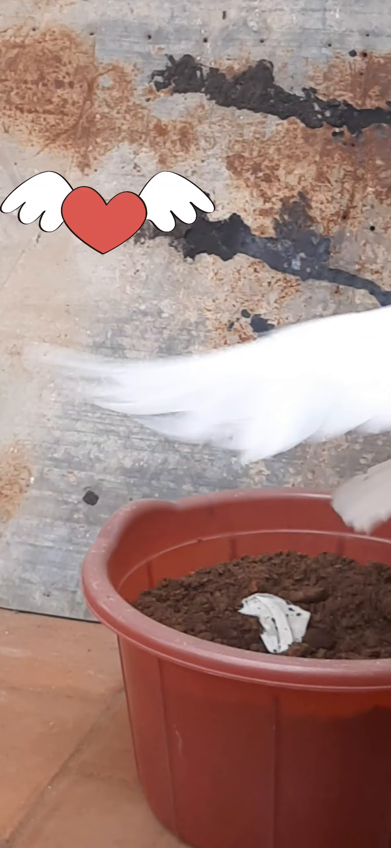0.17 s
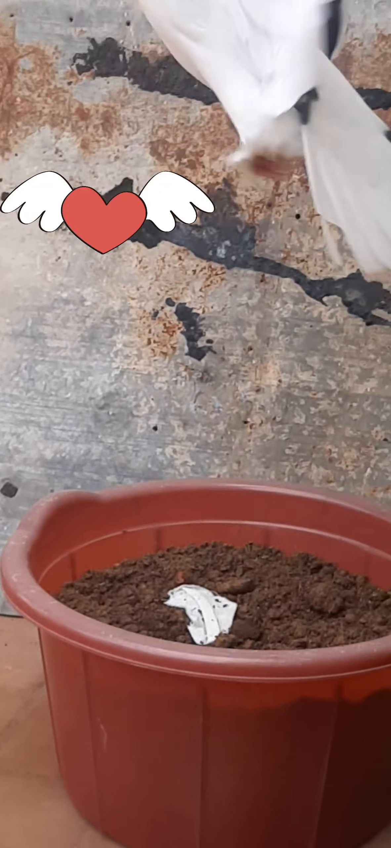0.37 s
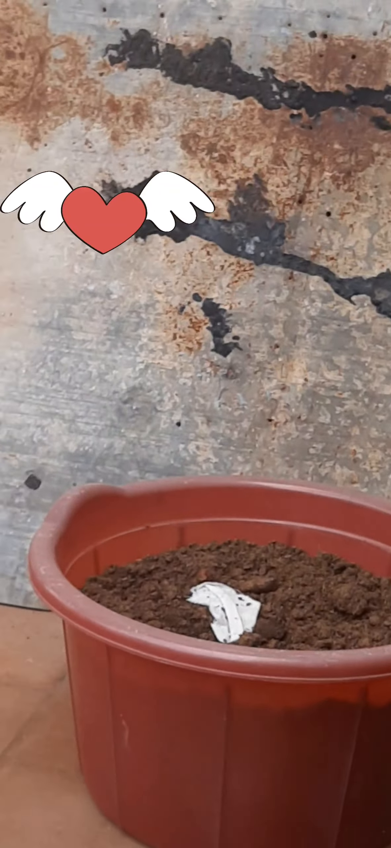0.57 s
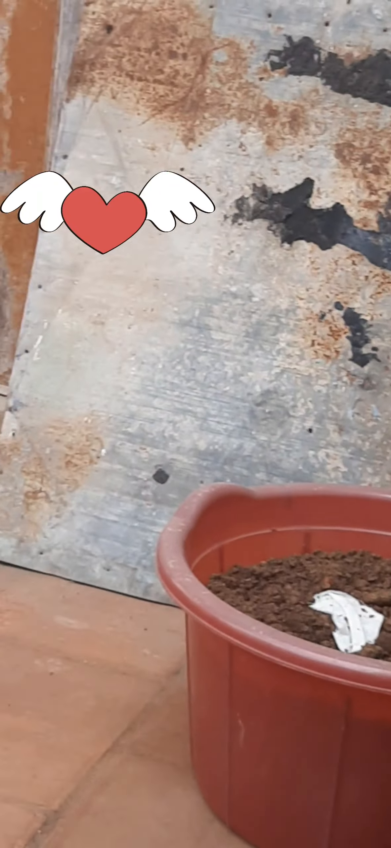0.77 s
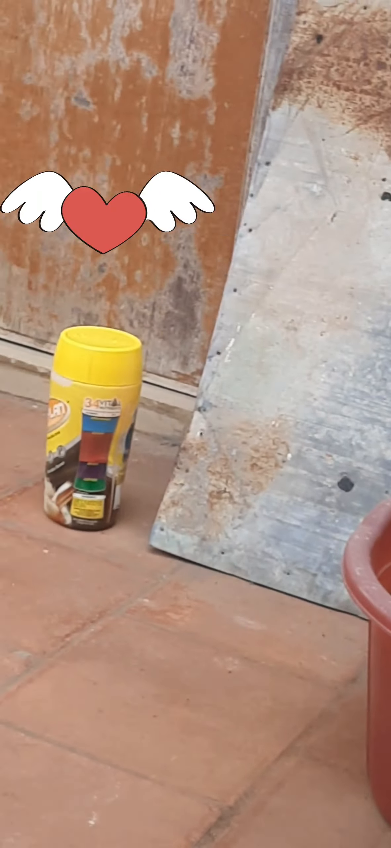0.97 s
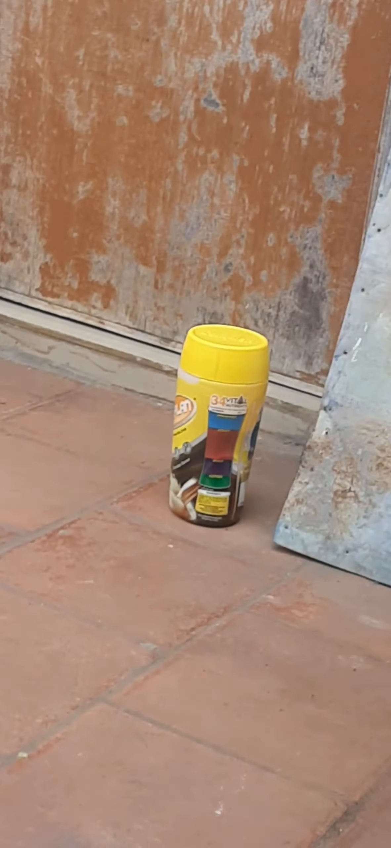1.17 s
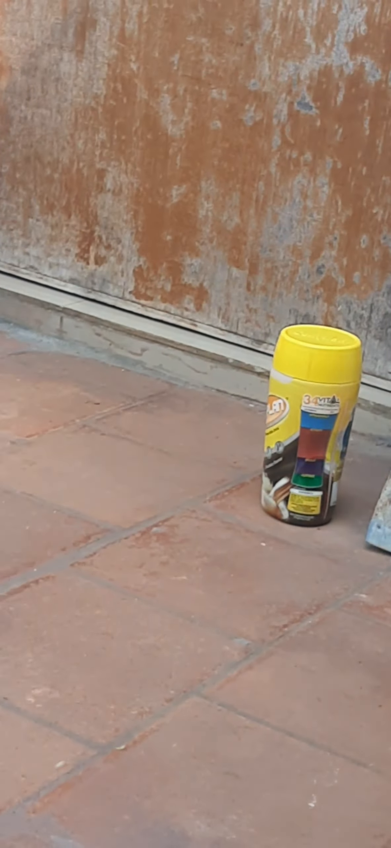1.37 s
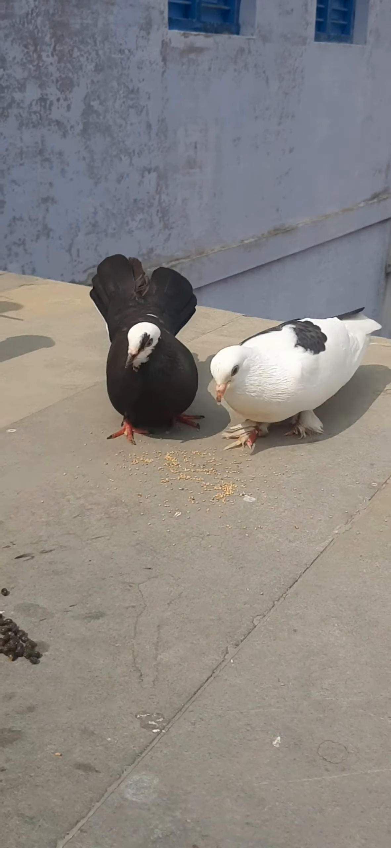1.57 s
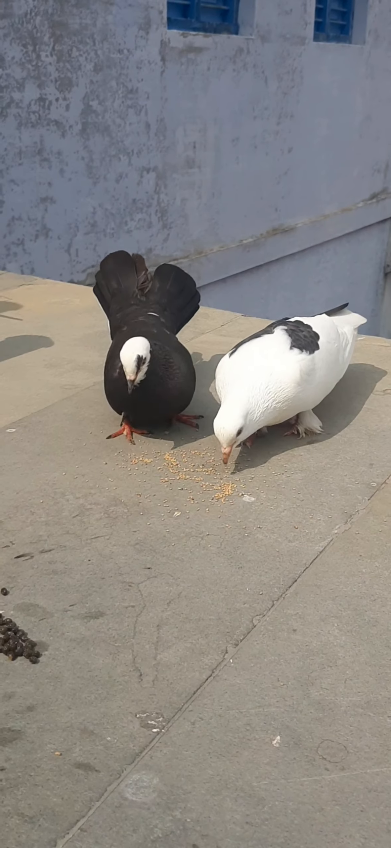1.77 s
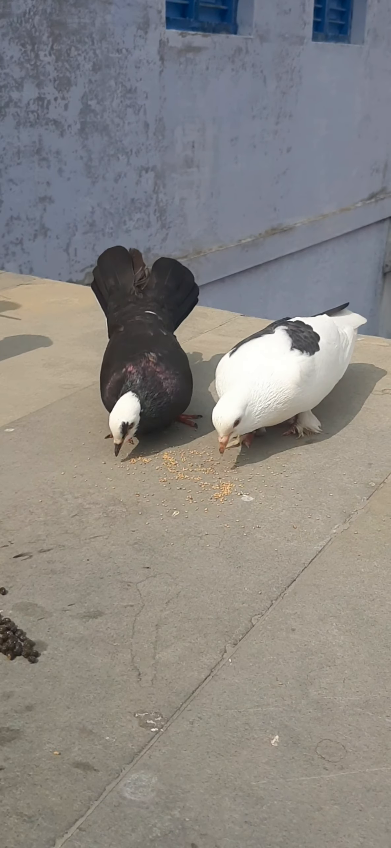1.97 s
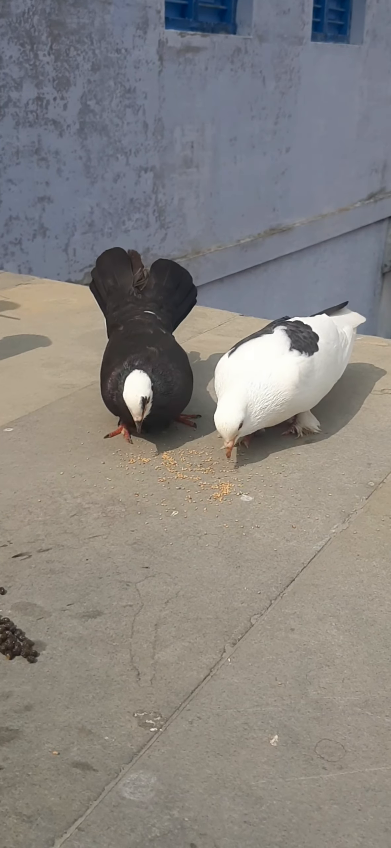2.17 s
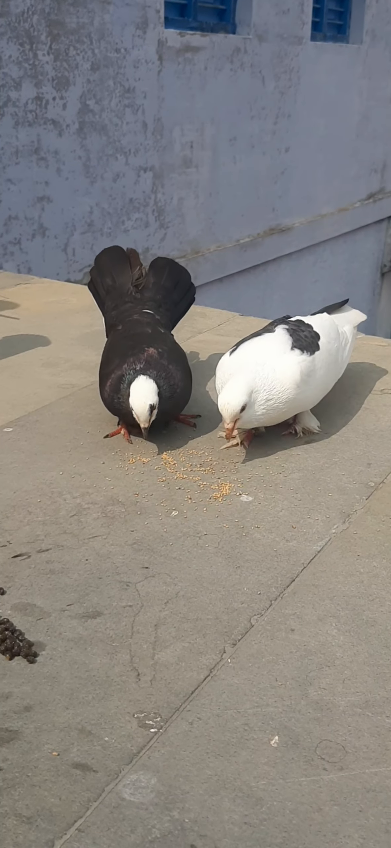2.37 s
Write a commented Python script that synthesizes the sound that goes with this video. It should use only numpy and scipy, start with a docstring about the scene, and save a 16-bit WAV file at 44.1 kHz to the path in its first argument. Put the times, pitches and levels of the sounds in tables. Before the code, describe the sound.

Pigeon wings clap and swish after a few hoarse chirps, echoing off yard walls and puffing air against the microphone. Rasping clucks and one thin squeal come from other birds, then everything cuts to a quiet terrace with low rumble.

```python
"""A small tiled yard: a pigeon takes off, wing tips clapping together and echoing off the walls.
Its feathers rustle, and its wings push air that swishes and buffets the microphone. Other birds
give hoarse chirps, rasping clucks and one long squeal. After a short silence, a quiet open terrace:
low rumble, faint air and a distant bird."""
import sys
import numpy as np
from scipy import signal
from scipy.fft import rfft, irfft
from scipy.io import wavfile
from scipy.ndimage import uniform_filter1d

SR = 44100
rng = np.random.default_rng(int(sys.argv[2]) if len(sys.argv) > 2 else 0)


def wrap_up_sound(samples):
    """Save the sound to the file named by the first command line argument, as 16-bit audio."""
    columns = np.atleast_2d(samples).T
    # keep every value between -1 and 1, then stretch to whole-number steps
    tamed = np.clip(columns, -1, 1)
    steps = np.round(tamed * 32767).astype(np.int16)
    wavfile.write(sys.argv[1], SR, steps)


N = 110250
TIME_S = np.arange(N) / SR
BINS_HZ = np.fft.rfftfreq(N, 1 / SR)


def amp(db):
    return 10 ** (np.asarray(db) / 20)


def unit_rms(x):
    return x / np.sqrt(np.mean(x ** 2) + 1e-20)


def at_hz(table, hz):
    """Interpolate a spectrum table over log frequency."""
    freq_hz, value = np.transpose(table)
    return np.interp(np.log(hz + 1), np.log(freq_hz + 1), value)


def curve(table, column=1):
    """Interpolate a time table at every sample."""
    rows = np.array(table)
    return np.interp(TIME_S, rows[:, 0], rows[:, column])


def add(mix, start_s, sound):
    part = mix[..., max(round(start_s * SR), 0):][..., :sound.shape[-1]]
    part += sound[..., :part.shape[-1]]


def colour(x, db_at_hz):
    """Minimum-phase filter."""
    log_gain = np.log(amp(db_at_hz(abs(np.fft.fftfreq(4096, 1 / SR)))))
    taps = np.fft.ifft(np.exp(np.conj(signal.hilbert(log_gain)))).real[:2048]
    return signal.fftconvolve(x, taps[None], axes=1)[:, :x.shape[1]]


def white_pair(correlation, count=N):
    left, other = rng.standard_normal((2, count))
    return np.array([left, correlation * left + np.sqrt(1 - correlation ** 2) * other])


def noise(tone, correlation):
    """Stereo noise of a given spectrum, rms 1."""
    return unit_rms(irfft(rfft(white_pair(correlation)) * amp(at_hz(tone, BINS_HZ)), N))


def wobble(rate_hz, count=N):
    """Smooth random motion, rms about 1."""
    spectrum = rfft(rng.standard_normal(N)) * np.exp(-(BINS_HZ / rate_hz) ** 2)
    return unit_rms(irfft(spectrum, N))[:count]


def steady(x):
    """Even out slow swells."""
    return x / np.sqrt(uniform_filter1d((x ** 2).mean(0), 3000) + 1e-9)


def note(length_s, pitches_hz, jitter):
    """Phase and envelope of a note bending through three pitches."""
    progress = np.linspace(0, 1, int(length_s * SR))
    pitch_hz = np.polyval(np.polyfit([0, .5, 1], pitches_hz, 2), progress)
    pitch_hz *= 1 + jitter * wobble(170, len(progress))
    return 2 * np.pi * np.cumsum(pitch_hz) / SR, np.sqrt(2 * abs(np.sin(np.pi * progress)))


def yard_ring(x):
    """Diffuse ring of the walled yard, different at each ear."""
    # reverberation time: freq_hz, t60_s
    decay = [(60, 0.92), (400, 0.46), (1500, 0.26), (5000, 0.29), (15000, 0.22)]
    hz, t, spectra = signal.stft(rng.standard_normal((2, SR * 2 // 3)), SR, nperseg=256)
    tail = signal.istft(spectra * amp(-60 * t / at_hz(decay, hz)[:, None]), SR, nperseg=256)[1]
    tail *= np.minimum(np.arange(tail.shape[1]) / SR / .007, 1)
    tail /= np.linalg.norm(tail[0])
    return signal.fftconvolve(np.atleast_2d(x), tail, axes=1)[:, :x.shape[-1]]


def yard_air():
    """Faint, steady background air."""
    # air spectrum: freq_hz, gain_db
    tone = [(30, 0), (70, 6), (170, 10), (300, 2), (600, -7), (1200, -11), (2000, -11), (3000, -15),
            (5000, -13), (7500, -17), (9000, -28), (11500, -21), (15500, -20)]
    return amp(-59) * noise(tone, correlation=.47)


def chirps():
    """Hoarse, mostly falling chirps: a whistle smeared into a narrow band."""
    # chirps: start_s, length_s, first_hz, middle_hz, last_hz, relative_db, width_hz
    calls = [(0.019, 0.05, 2350, 2166, 2030, -53, 140), (0.061, 0.047, 2070, 1850, 1600, -56.5, 150),
             (0.128, 0.095, 4500, 3740, 3260, -43.5, 400), (0.172, 0.08, 3350, 2790, 2460, -33.5, 300),
             (.298, .04, 2350, 2344, 2500, -39.5, 220)]
    out = np.zeros((2, N))
    for start_s, length_s, *pitches_hz, relative_db, width_hz in calls:
        phase, envelope = note(length_s, pitches_hz, jitter=.058)
        whistle = np.exp(1j * phase) + amp(-20) * np.exp(2j * phase)
        for ear in out:
            rasp = (wobble(width_hz, len(phase)) + 1j * wobble(width_hz, len(phase))) / np.sqrt(2)
            add(ear, start_s, amp(relative_db - 8) * envelope ** 2 * (rasp * whistle).real)
    return out + amp(-1.5) * yard_ring(out)


def buffet():
    """Wing draught on the microphone: bass noise, nearly mono."""
    # draught strength: time_s, level_db
    levels = [(0, -67), (.12, -57), (.17, -53), (.215, -62), (.25, -40), (.32, -52.5), (.365, -37),
              (.42, -42), (.49, -33.5), (.55, -43), (.6, -31.5), (.67, -42), (.73, -36), (.81, -44.5),
              (.87, -40), (.94, -45), (1.01, -42), (1.12, -42), (1.27, -42), (1.34, -52.5), (1.38, -47),
              (1.45, -53), (1.58, -54.5)]
    # draught spectrum: freq_hz, gain_db
    tone = [(15, -16), (35, -8), (62, 2), (108, 0), (150, -11), (250, -25), (600, -55), (2000, -90)]
    return steady(noise(tone, correlation=.95)) * amp(curve(levels))


def rustle():
    """Rustling feathers: broad noise with slow flutter and fine grain."""
    # rustle strength: time_s, level_db
    levels = [(0, -85), (.13, -64), (.18, -50.5), (.23, -40), (.29, -42.5), (.34, -40.5), (.39, -36.5),
              (.46, -34.5), (.56, -34.5), (.68, -38.5), (.83, -44.5), (.95, -42), (1.02, -37.5),
              (1.12, -40), (1.19, -44.5), (1.25, -38.5), (1.34, -47.5), (1.58, -49)]
    # rustle spectrum: freq_hz, gain_db
    tone = [(30, -10), (100, -3), (250, 3), (450, -2), (600, -2), (800, 2), (1200, -.5), (1600, 1),
            (2500, -3), (4500, -3), (7500, -6), (11000, -8), (15500, -8)]
    return noise(tone, correlation=.083) * amp(curve(levels) + 1.3 * wobble(50) + 1.5 * wobble(1100))


def clucks():
    """Short, rasping two-partial calls across the yard."""
    # clucks: start_s, length_s, first_hz, middle_hz, last_hz, relative_db, octave_db
    calls = [(0.136, 0.09, 584, 585, 552, -55.5, -23), (.315, .035, 476, 537, 600, -43.5, -17),
             (0.383, 0.032, 650, 822, 1056, -33, -12), (0.502, 0.046, 780, 874, 770, -37, -9),
             (0.616, 0.052, 776, 830, 720, -36, -7), (0.751, 0.0478, 654, 765, 785, -33, -5),
             (.9, .05, 815, 778, 654, -41.5, -2.5), (1.252, 0.057, 557, 615, 707, -45, -10),
             (1.409, 0.057, 787, 778, 760, -50, 4.5)]
    out = np.zeros(N)
    for start_s, length_s, *pitches_hz, relative_db, octave_db in calls:
        phase, envelope = note(length_s, pitches_hz, jitter=.032)
        rasp = unit_rms(amp(2.2 * wobble(160, len(phase))))
        voice = np.sin(phase) + amp(octave_db) * np.sin(2 * phase)
        add(out, start_s, amp(relative_db) * envelope * rasp * voice)
    return amp(-3) * out + amp(-6) * yard_ring(out)


def swishes():
    """Air pushed by the wings: brief swells of band noise."""
    # swishes: peak_s, level_db, sigma_s, centre_hz
    strokes = [(0.266, -41, 0.0059, 820), (.362, -37, 0.0037, 280), (0.404, -34.5, 0.012, 1210),
               (.452, -40.5, 0.015, 750), (0.574, -33, 0.0075, 650), (.645, -48, 0.018, 800),
               (.70, -40, 0.0056, 600), (1.001, -39, 0.0041, 7500), (1.22, -35.5, 0.0052, 1410),
               (1.25, -48.5, 0.074, 880), (1.387, -44.5, 0.024, 261), (1.537, -49, .010, 291),
               (1.564, -44, 0.015, 1120)]
    half_band_oct = .76
    out = np.zeros((2, N))
    for peak_s, level_db, sigma_s, centre_hz in strokes:
        def band_db(hz):
            return -10 * np.log10(1 + (np.log2((hz + 20) / centre_hz) / half_band_oct) ** 4)
        air = unit_rms(colour(white_pair(.71), band_db))
        out += air * amp(level_db) * np.exp(-.5 * ((TIME_S - peak_s) / sigma_s) ** 2)
    return out


def clap(lead_in_s, crack_db, smack_db, rise_s, hold_s, decay_s, room_db, hollow_hz, hollow_db, tilt):
    """Wing tips crack, feather vanes smack together, the walls answer; tilt in dB/octave."""
    # wall echoes: delay_s, relative_db
    walls = [(.003, -7), (.0046, -16), (.0108, -16), (.0142, -13), (.0175, -20)]
    # yard ring spectrum: freq_hz, gain_db
    ring_tone = [(40, -33), (120, -15), (300, 4.5), (1000, 5.5), (16000, 4.5)]
    # clap spectrum: freq_hz, gain_db
    tone = [(40, -12.5), (100, 4.5), (300, 3.5), (800, 1.5), (1600, 1.5), (2500, 1), (5000, 2), (7500, 1.5),
            (11000, -3), (15500, 0)]
    crack_decay_s, left_lead_s, grain_db = .00041, .00036, .9
    count = SR // 2
    t = np.arange(count) / SR - lead_in_s
    snap = (t >= 0) * np.exp(-abs(t) / crack_decay_s)
    crack = unit_rms(snap * rng.standard_normal(count)) * np.sqrt(np.mean(snap ** 2))
    crack *= amp(crack_db + 5.5)
    envelope = np.exp(np.minimum(np.minimum(t / rise_s, (hold_s - t) / decay_s), 0))
    vanes = white_pair(.21, count) * amp(grain_db * wobble(1400, count))
    smack = unit_rms(vanes * envelope) * np.sqrt(np.mean(envelope ** 2))
    out = amp(smack_db + 2) * smack + crack * amp([[0], [-6]])
    out[1] = np.roll(out[1], round(left_lead_s * SR))
    for delay_s, relative_db in walls:
        for ear in out:
            add(ear, delay_s + rng.uniform(0, .00042), amp(relative_db + 3) * crack)
    ring = yard_ring(smack * .072 / np.sqrt(np.sum(envelope ** 2) / SR))
    out += amp(room_db) * colour(ring, lambda hz: at_hz(ring_tone, hz))

    def tone_db(hz):
        bump_db = hollow_db * np.exp(-(np.log2((hz + 1) / hollow_hz) / .4) ** 2)
        return at_hz(tone, hz) + bump_db + tilt * np.log2((hz + 500) / 2500)
    return colour(out, tone_db)


def wing_claps():
    """Take-off: four loud claps, then two faint ones."""
    # claps, levels relative: start_s, crack_db, smack_db, rise_s, hold_s, decay_s, room_db,
    # hollow_hz, hollow_db, tilt_db_per_oct
    beats = [(0.47, -14, -15.5, 0.0012, 0.0046, 0.0031, -22.5, 3020, 0, 0.2),
             (0.5888, -35, -18.5, 0.0024, 0.0055, 0.0087, -24.5, 4030, 3.5, 0.5),
             (0.7143, -8.5, -16, 0.0018, 0.0043, 0.0053, -23, 900, 1, -1.24),
             (0.8567, -10, -22.5, .0005, 0.0078, 0.0025, -24.5, 1300, 4, -.5),
             (1.3691, -27, -30, 0.00023, 0.018, 0.0067, -30, 600, 7.5, -1.14),
             (1.5195, -24, -29, .0008, 0.0038, 0.02, -37, 5800, 4, 1)]
    lead_in_s = .008
    out = np.zeros((2, N))
    for start_s, *settings in beats:
        add(out, start_s - lead_in_s, clap(lead_in_s, *settings))
    return out


def squeal():
    """A thin call holds, climbs and drops, purer as it rises; each partial flutters."""
    # call contour: time_s, pitch_hz, relative_db, octave_db
    contour = [(.935, 1500, -50, 1), (.96, 1435, -37.5, -6.5), (.99, 1404, -29, -6.5),
               (1.02, 1420, -37.5, 1), (1.06, 1650, -36.5, -5), (1.11, 1970, -33.5, -12),
               (1.152, 2278, -27.5, -31), (1.18, 2272, -29, -27), (1.21, 1890, -38, -18),
               (1.228, 1780, -42, -18)]
    jitter, flutter_db, fade_s = .007, 1.2, .0071
    phase = 2 * np.pi * np.cumsum(curve(contour) * (1 + jitter * wobble(200))) / SR
    gate = np.clip(np.minimum(TIME_S - contour[0][0], contour[-1][0] - TIME_S) / fade_s, 0, 1)
    first, second, third = [np.sin(k * phase) * amp(flutter_db * wobble(75)) for k in (1, 2, 3)]
    overtones = amp(curve(contour, column=3)) * (second + amp(-8) * third)
    out = gate * amp(curve(contour, column=2)) * (first + overtones)
    return amp(-5.5) * out + amp(-4.5) * yard_ring(out)


def terrace_air():
    """Low rumble under faint, wavering air."""
    # background strength: time_s, rumble_db, air_db
    levels = [(1.6, -50, -59), (1.76, -48.5, -59), (1.85, -51, -61.5), (1.95, -46.5, -61.5),
              (2.02, -51.5, -59.5), (2.08, -45, -57), (2.17, -48, -62), (2.25, -51.5, -57.5),
              (2.33, -45, -54.5), (2.42, -46, -52.5), (2.5, -39.5, -50.5)]
    # rumble spectrum: freq_hz, gain_db
    rumble_tone = [(20, -51), (55, -25), (80, -13), (101, 0), (120, -11.5), (190, -19.5), (280, -28.5),
                   (450, -33.5), (1200, -79.5)]
    # air spectrum: freq_hz, gain_db
    air_tone = [(40, -8), (170, 8.5), (330, 10.5), (520, -1), (750, 3), (1200, -1.5), (1800, -1),
                (3000, -9.5), (5000, -8), (7500, -14.5), (9000, -22.5), (11500, -15), (15500, -20)]
    rumble = steady(noise(rumble_tone, correlation=.88)) * amp(curve(levels))
    air = noise(air_tone, correlation=.21) * amp(curve(levels, column=2) + 2.03 * wobble(31.5))
    return rumble + air


def hiss():
    """Hiss as the terrace opens, slightly to the right."""
    # hiss spectrum: freq_hz, gain_db
    tone = [(100, 3), (500, -7), (1500, 0), (4000, 0.5), (7000, -3), (8200, 5), (8700, -4), (11000, -12),
            (15500, -20)]
    left_db, right_db, end_s, fade_s = -49, -46, 1.75, .015
    gate = np.clip((end_s - TIME_S) / fade_s, 0, 1)
    return noise(tone, correlation=.2) * amp([[left_db], [right_db]]) * gate


def distant_bird():
    """Five faint pure notes near one pitch."""
    # notes: start_s, length_s, first_hz, middle_hz, last_hz, level_db
    calls = [(1.633, 0.044, 740, 712, 720, -60), (1.694, 0.15, 745, 742, 730, -59.5),
             (1.963, 0.053, 717, 712, 710, -63.5), (2.193, 0.089, 705, 714, 740, -60.5),
             (2.321, 0.029, 720, 730, 708, -63)]
    out = np.zeros(N)
    for start_s, length_s, *pitches_hz, level_db in calls:
        phase, envelope = note(length_s, pitches_hz, jitter=.0073)
        add(out, start_s, amp(level_db) * envelope * np.sin(phase))
    return out


def scene():
    """The yard, a moment of silence, then the terrace."""
    yard_end_s, terrace_start_s, fade_s = 1.5785, 1.609, .002
    yard = yard_air() + chirps() + buffet() + rustle() + clucks() + swishes() + wing_claps() + squeal()
    terrace = terrace_air() + hiss() + distant_bird()
    yard_gate = np.clip((yard_end_s - TIME_S) / fade_s, 0, 1)
    terrace_gate = np.clip((TIME_S - terrace_start_s) / fade_s, 0, 1)
    return yard_gate * yard + terrace_gate * terrace


def record(dry):
    """Two close microphone ports with a treble dip, soft overload, then a band limit."""
    # stereo width, close ports share their bass: freq_hz, side_db
    width = [(20, -6.5), (120, -8.5), (250, -9.5), (600, -0.5), (1100, 2.5), (2000, 1.5), (16000, 0)]
    # microphone response: freq_hz, gain_db
    response = [(20, 1.5), (7700, 0.5), (8500, -9), (9500, -5), (11000, -0.5), (12500, 1.5), (16000, 0.5)]
    ceiling, cutoff_hz = .6, 15950
    mid = (dry[0] + dry[1]) / 2
    side = irfft(rfft((dry[0] - dry[1]) / 2) * amp(at_hz(width, BINS_HZ)), N)
    ports = colour(np.array([mid + side, mid - side]), lambda hz: at_hz(response, hz))
    rounded = ceiling * np.tanh(ports / ceiling)
    low_pass = signal.firwin(401, cutoff_hz, window=("kaiser", 8), fs=SR)
    return signal.oaconvolve(rounded, low_pass[None], "same", axes=1)


dry = scene()
out = record(dry)
wrap_up_sound(out)
```